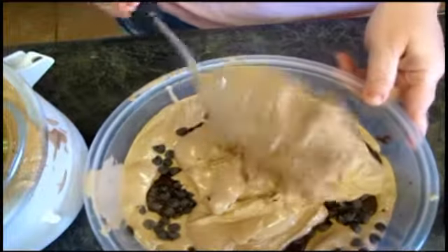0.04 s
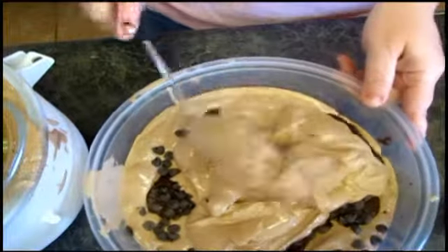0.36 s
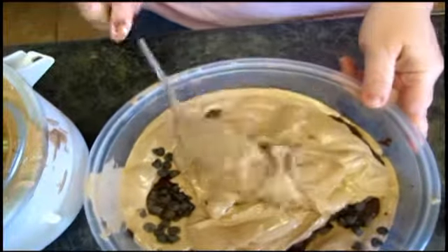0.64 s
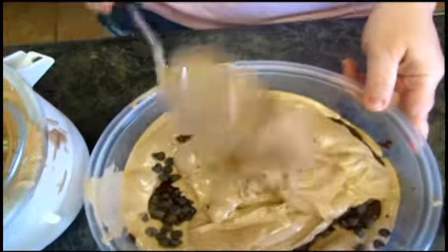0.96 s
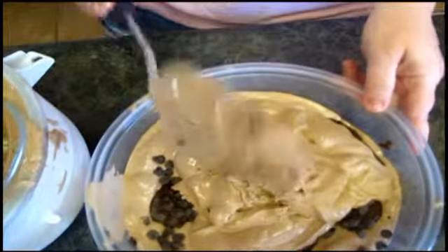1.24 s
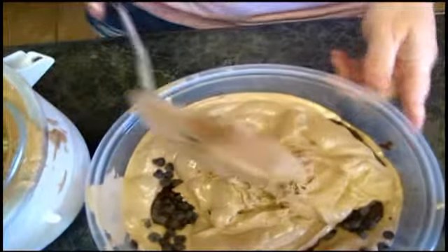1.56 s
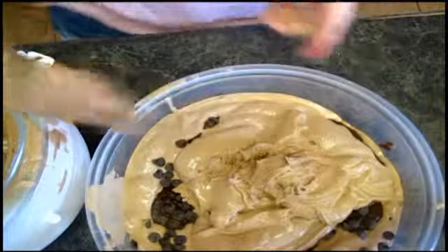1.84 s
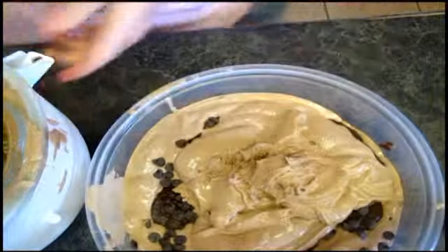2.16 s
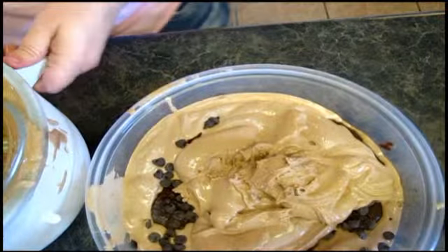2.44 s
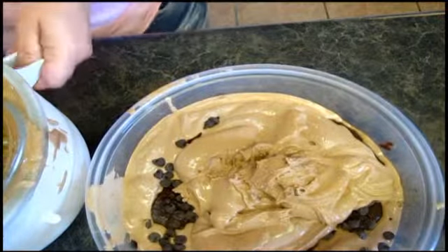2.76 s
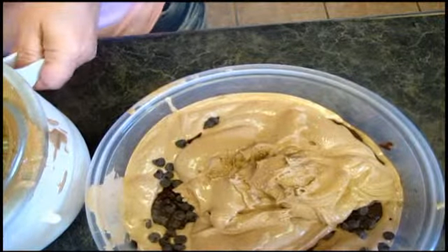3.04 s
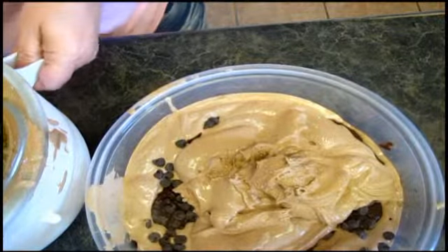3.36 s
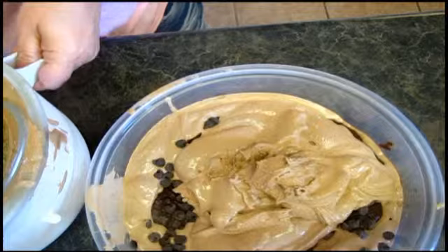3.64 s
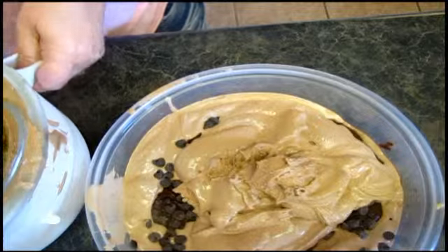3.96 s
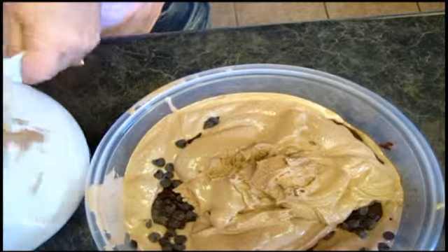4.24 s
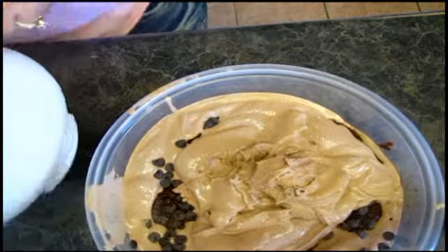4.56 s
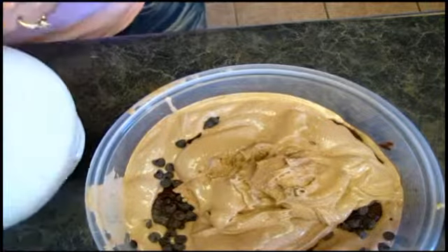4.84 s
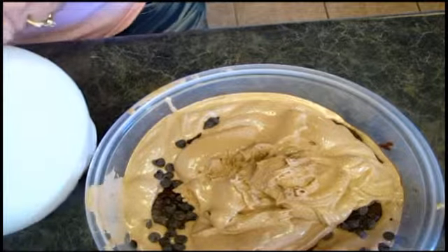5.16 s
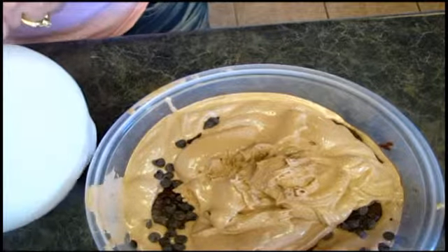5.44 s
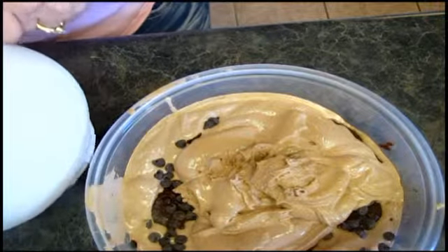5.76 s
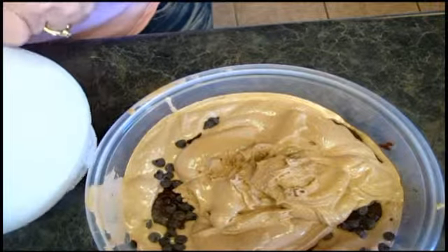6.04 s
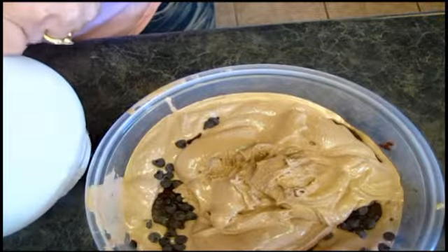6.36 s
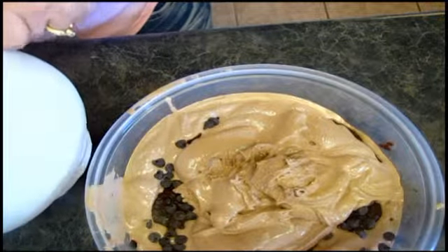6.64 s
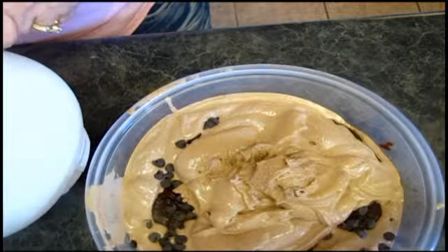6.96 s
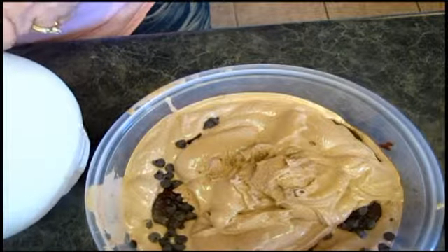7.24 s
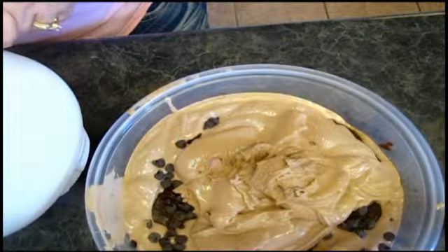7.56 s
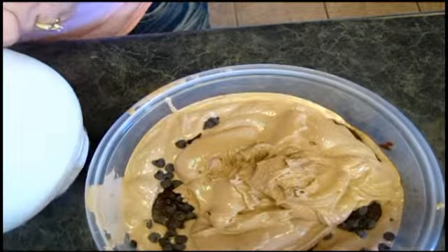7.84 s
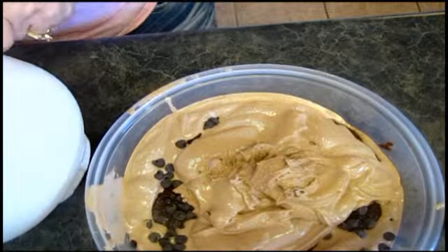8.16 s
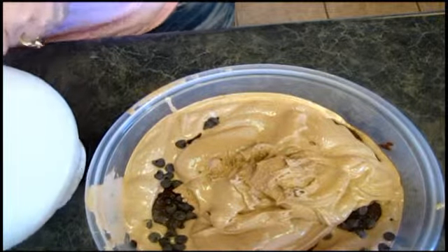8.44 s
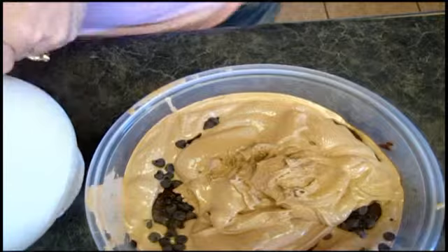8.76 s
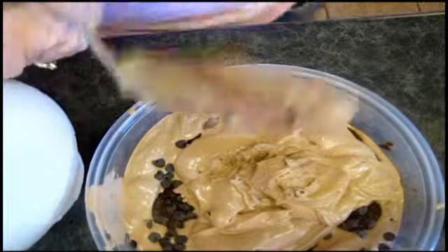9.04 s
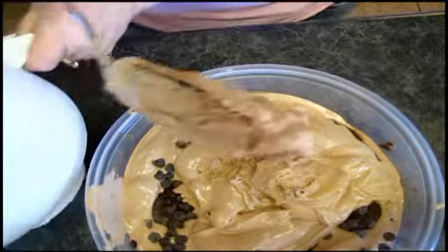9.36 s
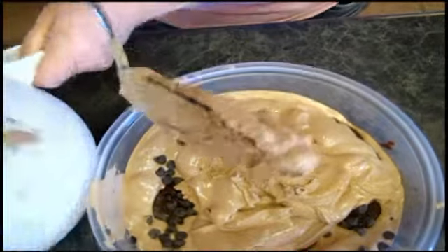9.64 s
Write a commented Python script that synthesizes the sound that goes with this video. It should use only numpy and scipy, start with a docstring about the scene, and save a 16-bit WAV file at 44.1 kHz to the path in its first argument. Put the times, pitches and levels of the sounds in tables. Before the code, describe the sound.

A metal spoon raps loudly seven times on a plastic tub, then softer scrapes, hollow knocks and a thud follow in a small kitchen.

```python
"""Spoon on a frozen dessert tub

A loaded metal spoon raps the rim of a plastic tub: the rim cracks and the tub booms, close enough to
overload the microphone. The spoon then scrapes and knocks in a hollow plastic ice-cream maker, which
tips over with a thud on the counter. One more rap comes at the end. A small kitchen rings after each
blow, over rustling sleeves, steady room noise and a faint bird outside."""
import sys
import numpy as np
from scipy import signal
from scipy.fft import rfft, irfft, next_fast_len
from scipy.io import wavfile

SR = 44100
rng = np.random.default_rng(int(sys.argv[2]) if len(sys.argv) > 2 else 0)


def file_out(sig):
    """Save sig as 16-bit WAV at sys.argv[1]."""
    # one column per channel
    cols = np.atleast_2d(sig).T
    # limit, then scale
    lim = np.clip(cols, -1, 1)
    pcm = np.round(lim * 32767).astype(np.int16)
    wavfile.write(sys.argv[1], SR, pcm)


N = 427769
TIME_S = np.arange(N) / SR
RING_S = np.arange(SR * 3 // 5) / SR  # time axis of one blow

# spoon on the rim: start_s, body_db, crack_db, pitch_ratio
RAPS = [(-.036, -4.5, -6, 0.85), (0.2015, -3, -4, 0.93), (0.4391, -1.5, -4, 0.97), (.6805, -0.7, -3, 0.98),
        (.918, -2.5, -3, 0.97), (1.169, -2.2, -2.5, 0.86), (1.4575, -5, -4, 0.99),
        (9.6767, -25, -12.5, 0.92)]
# tub, load and counter at pitch_ratio 1: pitch_hz, gain_db, t60_s
TUB_MODES = [(111.5, -18, 0.79), (147, -9.5, 0.26), (178, -17.5, 0.53), (215, -7.5, 0.19), (237, -4, 0.22),
             (315.6, -1, 0.11), (356, 1.5, 0.16), (400.7, 1.5, 0.098), (439, -13, 0.15), (503, -9.5, 0.28),
             (608, -8.5, 0.17), (695, -1.5, 0.11), (1230, -32, 0.41), (1220, -12, 0.099), (1385, -31, 0.42),
             (1610, -16.5, 0.29), (1746, -12, 0.26), (1776, -17, 0.29), (1894, -15.5, 0.28),
             (2170, -23.5, 0.56), (2256, -17.5, 0.096)]
# steel on the rim: freq_hz, gain_db
CRACK_EQ = [(40, -49), (110, -25), (300, 10), (700, 0), (1050, -3.5), (1800, 2), (2400, -0.5), (3100, -6),
            (4300, -4), (6800, -8.5), (9000, -15), (11500, -29.5)]

def raps(room, crack_t60_s=0.033, rebound_s=0.0096, rebound_db=-5, change=0.4, side_db=-6, apart_db=-16):
    """The spoon cracks on nearly the same spot of the rim, rebounds once and sets the tub booming."""
    out, spot = np.zeros((2, N)), burst(crack_t60_s)
    for start_s, body_db, crack_db, pitch_ratio in RAPS:
        crack = spot + change * burst(crack_t60_s)
        crack += undb(rebound_db) * np.interp(RING_S - rebound_s, RING_S, burst(crack_t60_s), left=0)
        echoes = (room + change * kitchen()) / np.hypot(1, change)  # the moving arm alters the echoes
        add(out, start_s, undb(crack_db) * snap(crack, CRACK_EQ, echoes, wet_db=-0.5))
        crack_side = snap(burst(crack_t60_s), CRACK_EQ, echoes[::-1], wet_db=-19)
        add(out, start_s, undb(crack_db + apart_db) * np.array([[1], [-1]]) * crack_side)
        boom = radiated(ring(TUB_MODES, pitch_ratio, scatter_db=2, opposed=False), cutoff_hz=146)
        boom_side = undb(side_db) * ring(TUB_MODES, pitch_ratio, scatter_db=10)
        add(out, start_s, undb(body_db) * spread(boom, boom_side, ROOM_WIDTH))
    return out


def load_shifts(room, count=4, delay_s=0.176):
    """The load shifts on the spoon with a faint tap on the upswing after the first raps."""
    out = np.zeros((2, N))
    for start_s, *_ in RAPS[:count]:
        add(out, start_s + delay_s, knock(room, body_db=-34, click_db=-34.5))
    return out


# hollow plastic shell: pitch_hz, gain_db, t60_s
SHELL_MODES = [(357, 2, 0.044), (463.7, 1.5, 0.12), (534, -8, 0.1), (577, -4, 0.11), (702, 9, 0.049),
               (850, 1, 0.075), (960, -21, 0.04), (1204, -6, 0.042), (1357, -6, 0.03), (1816, -13, 0.047),
               (2426, -10, 0.053), (3680, -30, 0.04)]
# click on plastic: freq_hz, gain_db
CLICK_EQ = [(40, -24), (200, -6), (600, 6.5), (1400, 6.5), (2600, 4), (3700, 1), (5500, -2), (8500, -8),
            (11500, -18.5)]

def knock(room, body_db, click_db, deep_db=0, deep_hz=496, deep_width_hz=62):
    """The shell clicks and rings; a blow near its middle brings out a deep note."""
    modes = [(hz, db + deep_db * np.exp(-((hz - deep_hz) / deep_width_hz) ** 2), t60_s)
             for hz, db, t60_s in SHELL_MODES]
    body = ring(modes, pitch_ratio=1 + 0.005 * rng.standard_normal(), scatter_db=3)
    click = snap(burst(t60_s=0.023), CLICK_EQ, room, wet_db=-4)
    return undb(body_db) * in_room(body, room, wet_db=-3.5) + undb(click_db) * click


# blows on the machine: start_s, body_db, click_db, deep_boost_db, cavity_db, rebound_rel_db
KNOCKS = [(0.0209, -35, -17, 0, -50, -30), (2.722, -37, -21, 7, -47, -14), (2.7675, -26, -22, 10, -45, -13),
          (3.2863, -20, -23, 18, -42, -9.5), (3.592, -29, -23.5, 10, -54, -22),
          (3.677, -18.5, -23.5, 4, -32, -10), (3.7242, -21, -25, 13, -38, -7),
          (3.765, -15.5, -15, 10.5, -30, -8.5), (4.184, -27, -36.5, 4, -40, -15),
          (4.84, -25.5, -45, 16, -50, -29), (6.439, -41, -38, 0, -46, -15),
          (6.633, -29.5, -32, 1, -39, -18), (6.7696, -33, -48, 1, -54, -12),
          (6.9059, -26.5, -26, 4, -43, -11), (6.9726, -31.5, -34, -2, -47, -15),
          (7.2425, -31, -42, -8, -50, -18), (7.4835, -25, -23.5, -4, -41, 2),
          (7.643, -23.5, -28, 3, -25.5, -1.5), (7.6825, -24.5, -27, 15, -26, -6),
          (7.702, -25.5, -24.5, 3, -29, -16), (7.7857, -27, -27.5, 0, -24, -6)]
# air in the open canister: pitch_hz, gain_db, t60_s
CAVITY_MODES = [(449, -2, 0.25), (717, 0, 0.16), (852, -4, 0.15), (1216, -3.5, 0.18), (1623, -9.5, 0.087),
                (2450, 6, 0.066), (2595, -3, 0.14), (2905, 0.5, 0.071)]

def knocks(room, rebound_s=0.0095):
    """Spoon and hands hit hollow plastic, rebound once and ring the air inside."""
    out, cavity = np.zeros((2, N)), np.zeros(N)
    for start_s, body_db, click_db, deep_db, cavity_db, rebound_db in KNOCKS:
        blow = knock(room, body_db, click_db, deep_db)
        add(out, start_s, blow)
        add(out, start_s + rebound_s, undb(rebound_db) * blow)
        add(cavity, start_s, undb(cavity_db) * ring(CAVITY_MODES, scatter_db=3))
    return out + in_room(cavity, room, wet_db=-8)


# spoon along the wall: start_s, length_s, start_db, end_db, rasp_rel_db, cavity_rel_db
STROKES = [(2.496, 0.091, -53, -37.5, -2, -16), (2.792, 0.051, -35, -31.5, -7, -9),
           (3.161, 0.1, -38, -29.5, 0.5, -20), (3.679, 0.083, -20.5, -32, -6.5, -13),
           (4.179, 0.042, -27.5, -31, -16, -26), (4.243, 0.34, -43.5, -36, -8, -20),
           (5.107, 0.064, -36.5, -32, -3.5, -9.5), (6.504, 0.14, -46.5, -42, 0, -8),
           (6.658, .23, -48, -45, -11, -3), (6.9, 0.094, -32.5, -41.5, -5.5, -3.5),
           (7.45, .045, -34.5, -29.5, -3.5, -2), (7.63, .15, -33.5, -35, -10, -5),
           (7.793, 0.54, -36.5, -51.5, -5.5, -4.5)]
# icy grit: freq_hz, gain_db
GRIT_EQ = [(60, -46), (300, 5.5), (700, -11.5), (1000, -0.5), (1450, 1.5), (1900, 2), (2600, -2),
           (3800, -7), (5500, -16), (11500, -51)]
# treble rasp: freq_hz, gain_db
RASP_EQ = [(200, -59), (2500, -6), (4500, 3.5), (6500, -1.5), (9000, -7), (11500, -14.5)]

def scrapes(room, grit_db=-1, rasp_db=-1.5, shell_db=-10):
    """Icy grains slip under the spoon; the shell and the air in the canister ring along."""
    force, rasp_force, cavity_force = np.zeros((3, N))
    for start_s, length_s, start_db, end_db, rasp_rel_db, cavity_rel_db in STROKES:
        stroke = stroke_force(length_s, start_db, end_db)
        add(force, start_s, stroke)
        add(rasp_force, start_s, undb(rasp_rel_db) * stroke)
        add(cavity_force, start_s, undb(cavity_rel_db) * stroke)
    grains, air_ring = slips(), ring(CAVITY_MODES)
    grit = undb(grit_db) * unit_rms(colour(grains, GRIT_EQ))
    shell = undb(shell_db) * unit_rms(signal.fftconvolve(slips(), ring(SHELL_MODES))[:N])
    cavity = signal.fftconvolve(cavity_force * grains, air_ring / np.linalg.norm(air_ring))[:N]
    rasp = undb(rasp_db) * unit_rms(colour(slips(), RASP_EQ))
    return in_room(force * (grit + shell) + cavity + rasp_force * rasp, room, wet_db=-3)


def stroke_force(length_s, start_db, end_db, attack_s=0.0073, release_s=0.027):
    """The spoon bites, presses steadily harder or softer, and lets go."""
    t = np.arange(int((length_s + release_s) * SR)) / SR
    contact = np.clip(np.minimum(t / attack_s, 1 - (t - length_s) / release_s), 0, 1)
    return contact * undb(np.interp(t, [0, length_s], [start_db, end_db]))


def slips(grain_db=2.5, density=0.09):
    """Dense tiny slips of uneven size."""
    noise = rng.standard_normal(N)
    sizes = undb(grain_db * np.minimum(rng.exponential(size=N), 5))
    return noise * sizes * (rng.random(N) < density)


# heavy bumps: start_s, boom_db, clunk_db
THUDS = [(4.5558, -16, -18.5), (4.586, -31, -21.5), (4.84, -36, -28), (9.677, -15.5, -28)]
# counter top: pitch_hz, gain_db, t60_s
COUNTER_MODES = [(74, -3, .33), (114, 0, 0.26), (155, -8, 0.26), (201, -4, 0.19), (263, -9, 0.12),
                 (350, -1, .2), (496, 0, 0.34), (540, -13, 0.091), (703, 13.5, 0.029), (852, 0, 0.13),
                 (970, -15, 0.078)]
# noise of a bump: freq_hz, gain_db
CLUNK_EQ = [(30, -17), (100, 3.5), (500, 9.5), (900, 0), (1300, -2), (1900, -3.5), (3000, -11), (6000, -19),
            (11500, -41)]

def thuds(room):
    """A bump makes a dull clunk, and the counter booms under it."""
    out = np.zeros((2, N))
    for start_s, boom_db, clunk_db in THUDS:
        add(out, start_s, undb(boom_db) * in_room(ring(COUNTER_MODES, scatter_db=1.5), room, wet_db=-14))
        add(out, start_s, undb(clunk_db) * snap(burst(t60_s=0.12), CLUNK_EQ, room, wet_db=7))
    return out


def chatter(room, start_s=4.574, gap_s=0.01, count=4):
    """The tipped machine settles on the counter in quick, even bounces."""
    out = np.zeros((2, N))
    for bounce in range(count):
        add(out, start_s + bounce * gap_s, knock(room, body_db=-30, click_db=-32.5))
    return out


# sticky ticks: start_s, level_db
TICKS = [(3.157, -35), (3.484, -38.5), (5.299, -45), (5.321, -52), (5.420, -42), (5.566, -39.5),
         (5.6426, -35), (7.244, -38), (7.253, -32), (8.296, -58)]
# tick spectrum: freq_hz, gain_db
TICK_EQ = [(100, -43), (500, -6), (2000, -6.5), (3800, 1), (7000, 1.5), (11500, -12)]

def ticks(room):
    """Small sticky ticks, each a brief, bright contact noise."""
    out = np.zeros((2, N))
    for start_s, level_db in TICKS:
        add(out, start_s, undb(level_db) * snap(burst(t60_s=0.027), TICK_EQ, room, wet_db=-2))
    return out


# arm movements: centre_s, length_s, gain_db
REACHES = [(1.7, .5, -38.5), (2.626, 0.4, -36), (4.685, 0.18, -33), (5.863, 0.34, -42), (6.73, 0.34, -35),
           (7.376, 0.11, -37), (7.875, 0.28, -32.5), (8.473, 0.13, -39.5), (9.07, 0.31, -38.5)]
# rubbing cloth: freq_hz, gain_db
CLOTH_EQ = [(100, -26), (800, 5), (2000, 1), (4500, 1), (7000, -2.5), (9500, -8), (11500, -12)]

def sleeves(gain_db=-5.5, rest_gain_db=-39.5):
    """Sleeves hiss softly, swelling and fading with each reach of the arm."""
    reach_power = sum(undb(db) ** 2 * np.exp(-(2 * (TIME_S - centre_s) / length_s) ** 2)
                      for centre_s, length_s, db in REACHES)
    return undb(gain_db) * np.sqrt(undb(rest_gain_db) ** 2 + reach_power) * hiss(CLOTH_EQ)


# bird chirps: start_s, length_s, start_hz, end_hz, level_db
CHIRPS = [(2.878, 0.062, 4470, 3720, -41), (3.03, 0.06, 5180, 3370, -36), (4.274, 0.07, 4720, 4150, -37)]

def bird(room, flutter_depth=0.042, flutter_per_s=700):
    """Short falling whistles, made slightly hoarse by a fast pitch flutter."""
    out = np.zeros(N)
    for start_s, length_s, start_hz, end_hz, level_db in CHIRPS:
        noise = rng.standard_normal(len(RING_S))
        flutter = np.interp(RING_S * flutter_per_s, np.arange(len(noise)), noise)
        pitch_hz = np.linspace(start_hz, end_hz, int(length_s * SR))
        pitch_hz *= 1 + flutter_depth * flutter[:len(pitch_hz)]
        whistle = np.sin(2 * np.pi * np.cumsum(pitch_hz) / SR)
        add(out, start_s, undb(level_db) * np.hanning(len(whistle)) * whistle)
    return in_room(out, room, wet_db=-7)


# room noise: freq_hz, gain_db
AIR_EQ = [(15, -50), (25, -20), (65, -17), (86, -16), (105, -12), (139, -7.5), (171, 2), (227, -7),
          (251, -2), (350, -5), (441, -2), (489, -8), (2400, -23), (5440, -54), (11400, -33.5),
          (14900, -82), (22000, -120)]
# fridge hum: pitch_hz, level_db
FRIDGE_HUM = [(121, -54.5)]

def background(air_db=-43, whine_hz=5560, whine_width_hz=160, whine_db=-59):
    """Steady room noise with a fridge's hum and a thin, hissy whine."""
    hum = sum(undb(db) * np.sqrt(2) * np.sin(2 * np.pi * hz * TIME_S) for hz, db in FRIDGE_HUM)
    resonance = signal.iirpeak(whine_hz, whine_hz / whine_width_hz, fs=SR)
    whine = signal.lfilter(*resonance, rng.standard_normal(N))
    return undb(air_db) * hiss(AIR_EQ) + hum + undb(whine_db) * unit_rms(whine)


# stereo width of steady noise: freq_hz, side_minus_mid_db
HISS_WIDTH = [(60, -19), (110, -34), (190, -45), (340, -23), (610, -13.5), (1090, -4), (1940, -4.5),
              (3460, 2), (6160, -48.5), (11000, -23)]

def hiss(eq):
    """Steady coloured stereo noise."""
    mid, side = unit_rms(colour(rng.standard_normal((2, N)), eq))
    return spread(mid, side, HISS_WIDTH)


# kitchen reverberation: freq_hz, gain_db
ROOM_EQ = [(100, 5.5), (350, -7), (800, -0.5), (1800, -1), (4000, -4), (11000, -2.5)]
# stereo width in the kitchen: freq_hz, side_minus_mid_db
ROOM_WIDTH = [(100, -30), (300, -22.5), (700, -9), (1500, -6), (2800, 1), (4500, -11), (10000, -54)]

def kitchen(t60_s=0.36, first_echo_s=0.0012, build_s=0.0049, scatter_db=-2.5):
    """Room response: uneven early echoes thicken into a smooth tail."""
    onset = np.clip((RING_S - first_echo_s) / build_s, 0, 1)
    mid_side = []
    for _ in range(2):
        echoes = burst(t60_s) * onset
        echoes *= undb(scatter_db * fade(t60_s=0.1) * rng.standard_normal(len(RING_S)))
        mid_side.append(colour(echoes, ROOM_EQ) / np.linalg.norm(echoes))
    return spread(*mid_side, ROOM_WIDTH)


def in_room(x, room, wet_db):
    """Direct sound plus reverberation."""
    return x + undb(wet_db) * signal.fftconvolve(x[None], room, axes=1)[:, :len(x)]


def snap(noise, eq, room, wet_db):
    """Contact noise so brief that the room answers it as one impulse of equal energy."""
    echoes = undb(wet_db) * np.linalg.norm(noise) * room
    direct, *tail = colour(np.vstack([noise, echoes]), eq)
    gain = np.linalg.norm(unit_attack(direct)) / np.linalg.norm(direct)
    return gain * (direct + np.array(tail))


def ring(modes, pitch_ratio=1, scatter_db=0, opposed=True):
    """Struck modes; strengths vary with the place of the blow, neighbours may swing opposite ways."""
    gains = undb(scatter_db * rng.standard_normal(len(modes)))
    if opposed:
        gains[1::2] *= -1
    return unit_attack(sum(gain * undb(db) * fade(t60_s) * np.sin(2 * np.pi * hz * pitch_ratio * RING_S)
                           for gain, (hz, db, t60_s) in zip(gains, modes)))


def radiated(x, cutoff_hz):
    """A small body pushes little air below the cutoff."""
    highpass = signal.butter(5, cutoff_hz, btype="high", fs=SR, output="sos")
    return unit_attack(signal.sosfilt(highpass, x))


def burst(t60_s):
    """Dying noise: modes too close to tell apart."""
    return rng.standard_normal(len(RING_S)) * fade(t60_s)


def fade(t60_s):
    """Decay by 60 dB in t60_s."""
    return np.exp(-np.log(1000) * RING_S / t60_s)


def colour(x, eq):
    """Minimum-phase filter through (freq_hz, gain_db) points."""
    size = 2 * next_fast_len(x.shape[-1] // 2 + 2048, True)
    freq_hz, gain_db = np.transpose(eq)
    bins_hz = np.maximum(np.arange(size // 2 + 1) * SR / size, 1)
    gains = undb(np.interp(np.log(bins_hz), np.log(freq_hz), gain_db))
    cepstrum = irfft(np.log(gains))
    cepstrum[1:size // 2] *= 2
    cepstrum[size // 2 + 1:] = 0
    return irfft(rfft(x, size) * np.exp(rfft(cepstrum)))[..., :x.shape[-1]]


def spread(mid, side, width):
    """Left and right at two close ports: alike in the bass, apart in the presence range."""
    return mid + np.array([[1], [-1]]) * colour(side, width)


def add(out, start_s, sound):
    """Mix a sound in at start_s."""
    start = int(start_s * SR)
    skip = max(-start, 0)
    part = sound[..., skip:N - start]
    out[..., start + skip:start + skip + part.shape[-1]] += part


def undb(db):
    """Decibels to gain."""
    return 10 ** (np.asarray(db) / 20)


def unit_rms(x):
    """Scale to rms 1."""
    return x / np.sqrt(np.mean(x ** 2))


def unit_attack(x):
    """Scale to rms 1 over the first 10 ms."""
    return x / np.sqrt(np.mean(x[:SR // 100] ** 2))


def scene():
    """All sources in one kitchen."""
    room = kitchen()
    tub = raps(room) + load_shifts(room)
    machine = knocks(room) + ticks(room) + thuds(room) + chatter(room) + scrapes(room)
    return tub + machine + sleeves() + bird(room) + background()


def record(dry, band_hz=11700, top_hz=15800):
    """The sound is cut above band_hz, the loudest peaks clip flat, and the top is cut again."""
    narrow = signal.sosfilt(signal.ellip(8, 0.2, 70, band_hz, fs=SR, output="sos"), dry)
    clipped = np.clip(narrow, -0.99, 0.99)
    return signal.sosfilt(signal.ellip(8, 0.2, 70, top_hz, fs=SR, output="sos"), clipped)


dry = scene()
out = record(dry)
file_out(out)
```